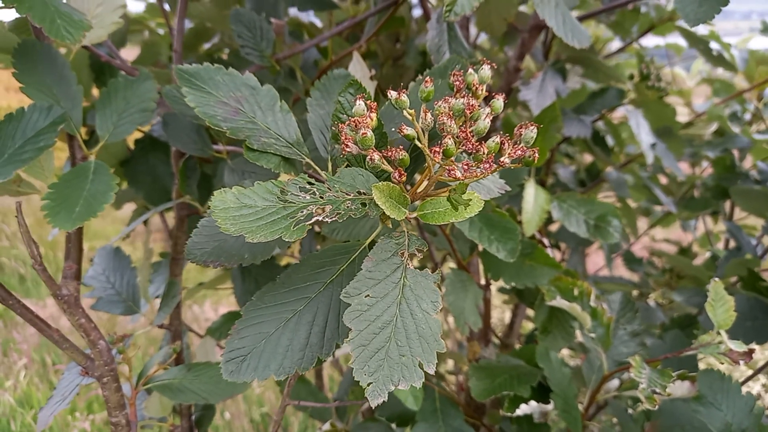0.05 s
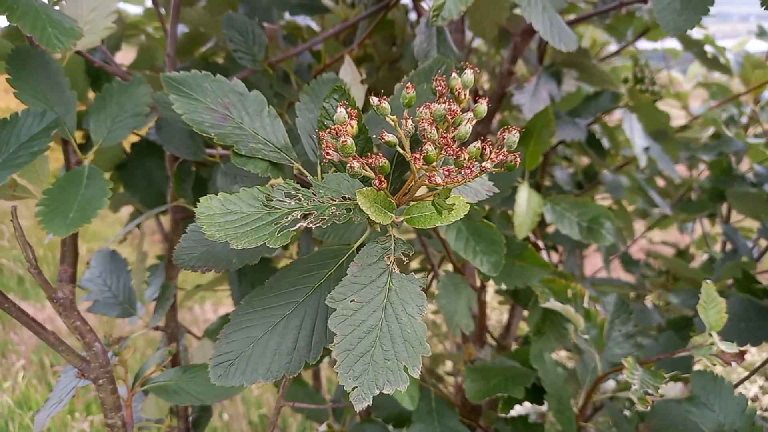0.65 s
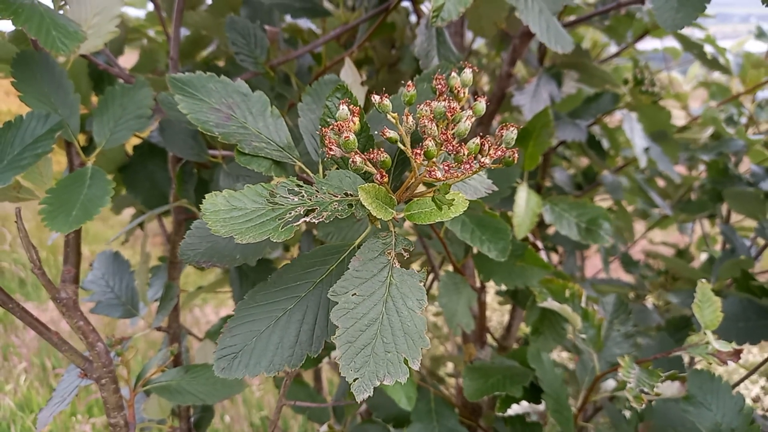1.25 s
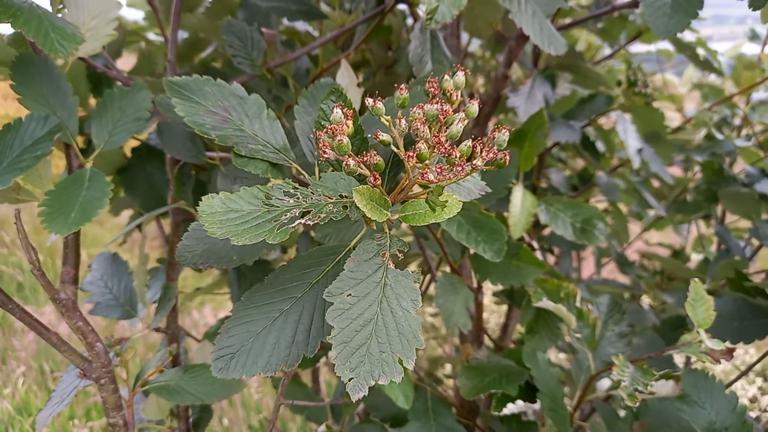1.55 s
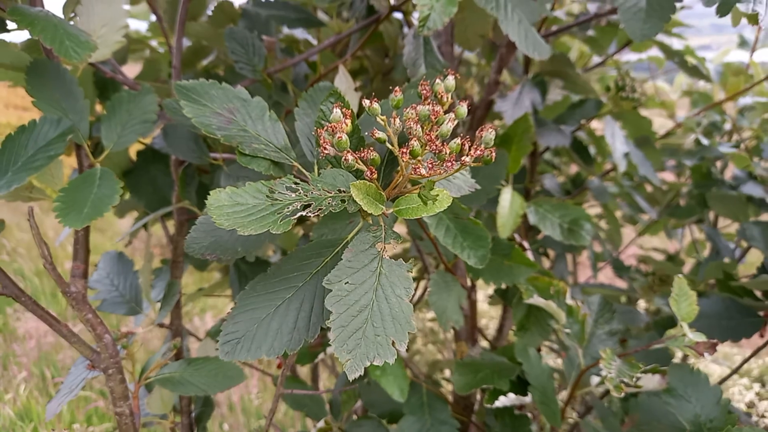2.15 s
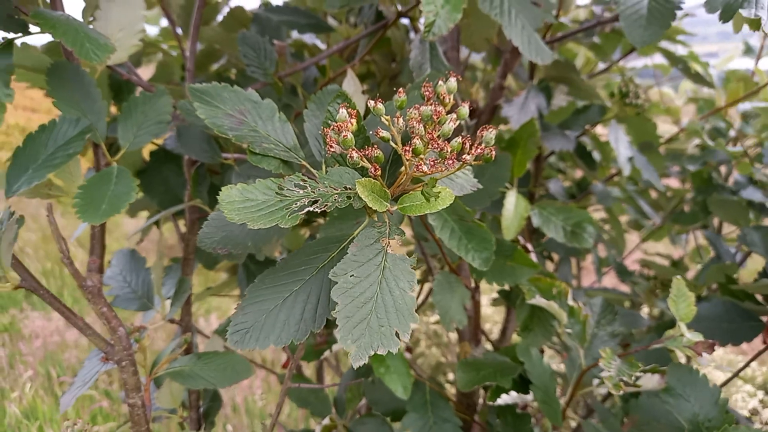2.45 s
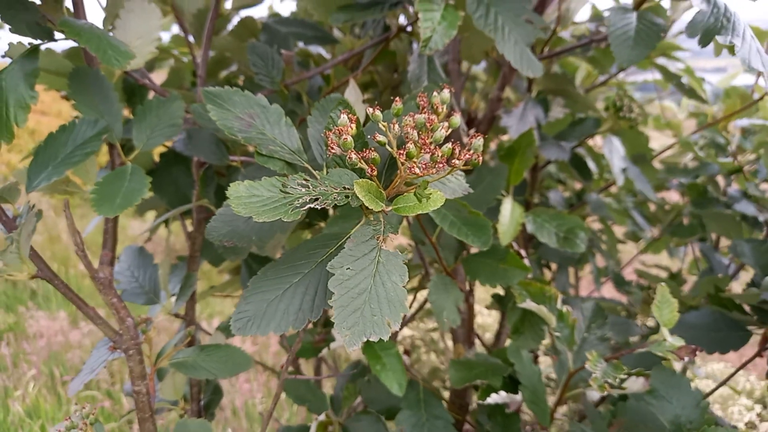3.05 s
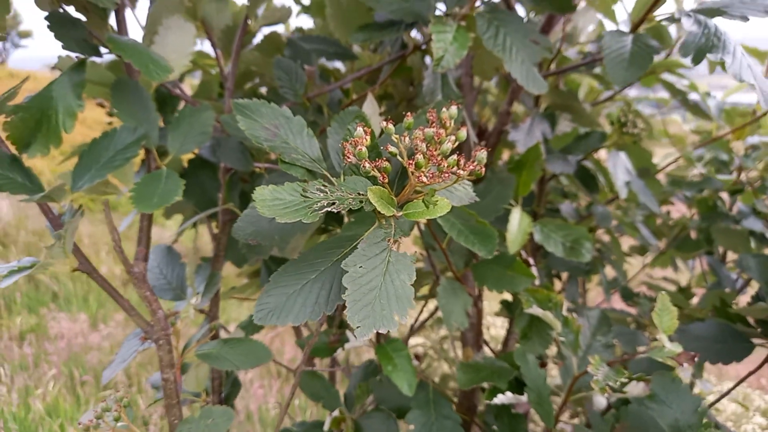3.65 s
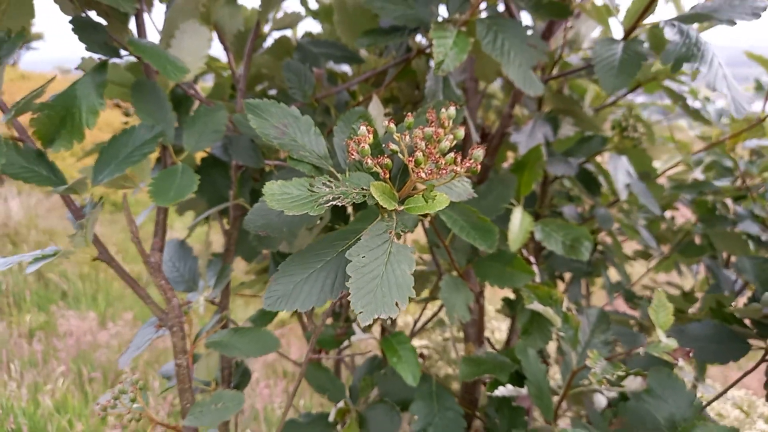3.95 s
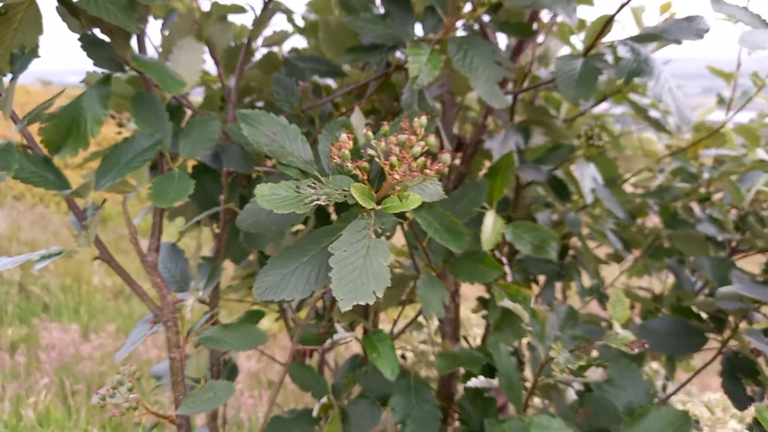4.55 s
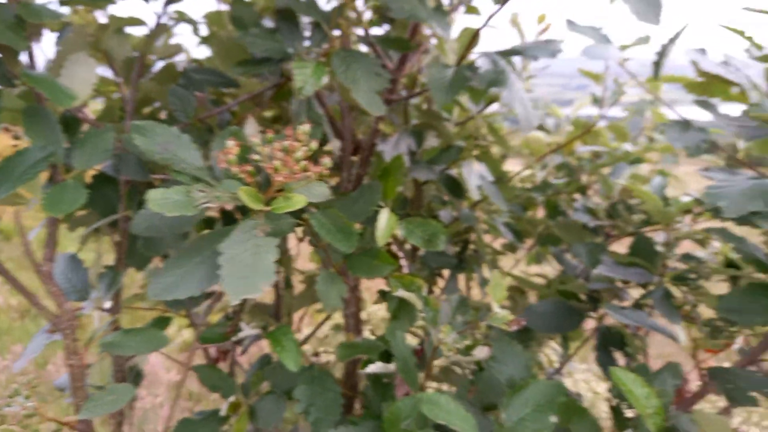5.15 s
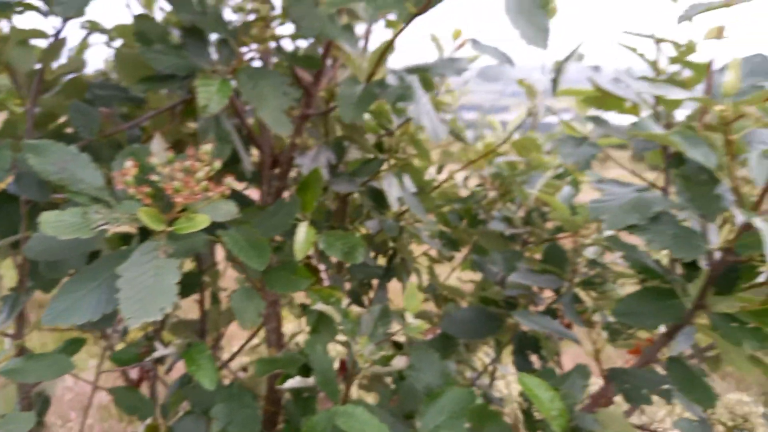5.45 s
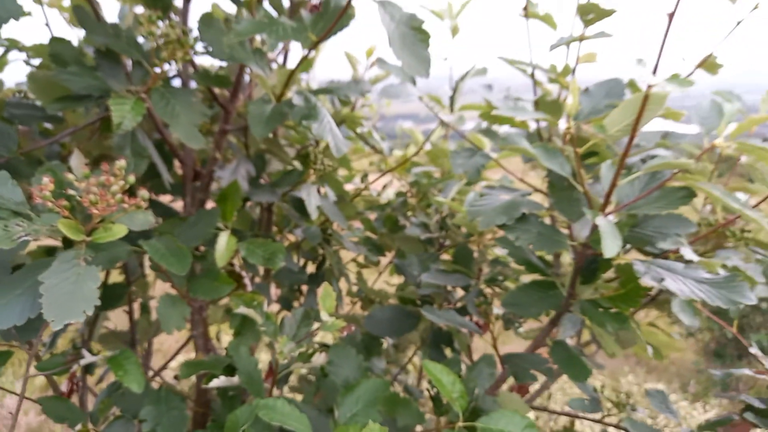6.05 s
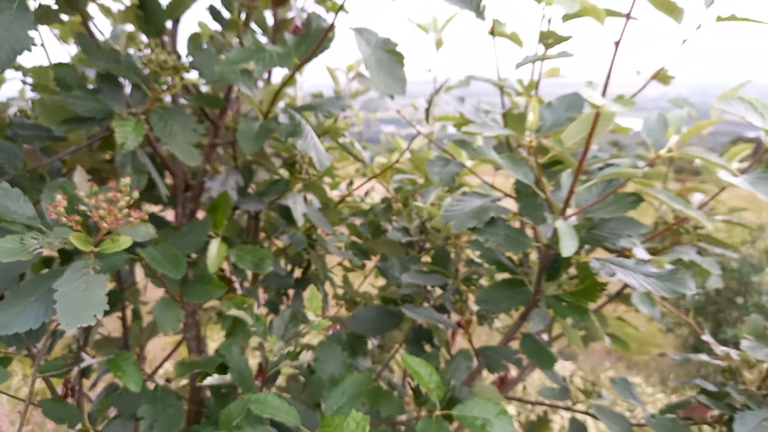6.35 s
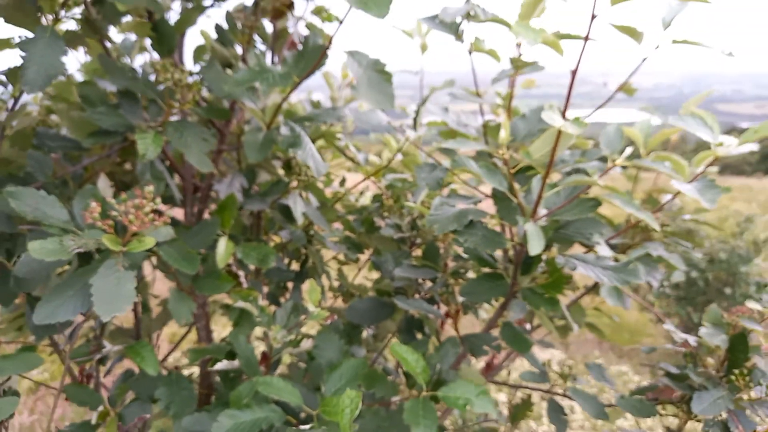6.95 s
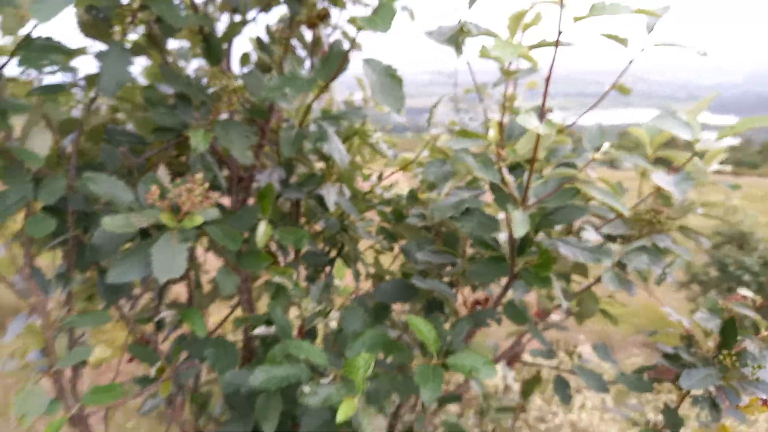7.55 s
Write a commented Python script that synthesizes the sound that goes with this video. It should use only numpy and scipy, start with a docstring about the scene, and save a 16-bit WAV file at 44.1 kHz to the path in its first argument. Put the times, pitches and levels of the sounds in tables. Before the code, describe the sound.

Evenly spaced raspy bird calls continue outdoors, with a gust of low wind buffeting early and faint leaf rustles later.

```python
"""A hoarse, crow-like bird calls to the right on an open hillside, rising and falling about every 0.8 s.
Its voice is jittery syrinx pulses and air through gliding throat resonances, scattered by the slope.
Over the faint valley hush, a gust buffets the two microphone ports from about 1.1 to 3.3 s.
Twigs tick and leaves rustle close by; late on, a small bird chirps far off."""
import sys
import numpy as np
from scipy import signal
from scipy.fft import rfft, irfft, next_fast_len
from scipy.io import wavfile
from scipy.ndimage import uniform_filter1d, map_coordinates

SR = 44100
rng = np.random.default_rng(int(sys.argv[2]) if len(sys.argv) > 2 else 0)


def file_out(sig):
    """Save sig as 16-bit WAV at sys.argv[1]."""
    # one column per channel
    cols = np.atleast_2d(sig).T
    # limit, then scale
    lim = np.clip(cols, -1, 1)
    pcm = np.round(lim * 32767).astype(np.int16)
    wavfile.write(sys.argv[1], SR, pcm)


N = 344862
TIME_S = np.arange(N) / SR
TOP_HZ = 15830

# Hoarse calls, levels relative: start_s, end_s, pitch_hz, climb_hz_per_s, scoop_s, drop_s, attack_s,
# swell_db, low_swell_db, low_hz, middle_hz, upper_hz, edge_hz, low_db, middle_db, upper_db, top_db,
# rough_share, gape_share, left_db, left_treble_db
CALLS = [ (-.45, 0.091, 262, 17.5, 0.042, 0.053, .04, -11, -3, 1320, 2030, 2430, 2840, -47, -51.5, -56.5, -70, 0.26, 0.2, -9, -17),
         (0.48, 0.959, 255, 45, 0.023, 0.065, 0.044, 5, 5.5, 1355, 2100, 2570, 2830, -47.5, -61.5, -60.5, -72, 0.1, 0, -10.5, -11),
         (1.151, 1.698, 270.7, 26.5, 0.043, 0.044, 0.022, 1, -7, 1386, 2126, 2467, 2780, -50.5, -55, -64, -72, 0.15, 0.01, -8, -11),
         (1.882, 2.472, 270.5, 37.5, 0.029, 0.048, 0.016, 11, 12.5, 1364, 2100, 2600, 2800, -61, -59.5, -68, -71.5, 0.18, 0.04, -6, -16),
         (2.653, 3.25, 273, 39, 0.054, .056, 0.052, -11, -15, 1480, 2050, 2740, 3830, -51, -60, -66.5, -61, 0.2, 1, -6.5, -7),
         (3.502, 4.164, 253.1, 49, 0.083, .036, 0.025, -5, 6, 1390, 1790, 2810, 3030, -65.5, -64.5, -70.5, -69.5, .08, 0, -6.5, -8.5),
         (4.387, 5.018, 259.8, -4.5, .118, 0.028, 0.04, 0, 3.5, 1398, 1883, 3000, 2950, -57, -57, -75, -70.5, .08, 0, -6, -23),
         (5.261, 5.768, 261.9, -10, 0.091, .016, 0.015, -7, 7, 1340, 1944, 2770, 3230, -58.5, -64, -77.5, -68.5, 0.02, 0.03, -4.5, -17),
         (6.089, 6.72, 247.6, 31, .06, 0.023, 0.042, -3.5, 1, 1330, 1740, 2620, 3300, -62.5, -69.5, -77, -66, .18, 0, -4, -35),
         (7.077, 7.713, 253.8, 60.5, 0.065, 0.055, 0.081, -5, -5.5, 1365, 1900, 2790, 3130, -55, -65, -70, -69, 0.06, 0, -6, -42)]
# Response of the low, middle, upper and top resonance to effort: attack_ratio, extra_swell_db
EFFORT_RESPONSE = [(1.57, -2.5), (1.4, -2), (1.25, 5), (0.62, 5.5)]
# Throat shaping around the resonances: freq_hz, gain_db
THROAT_SHAPE = [(950, -4), (1230, -16.5), (3600, 5.5), (4000, -1.5), (4550, -1.5), (4850, 1.5),
                (6100, -3.5), (7200, -5), (8000, -10.5)]
# Hillside decay: freq_hz, t60_s
HILLSIDE_DECAY = [(500, 0.15), (2000, 0.39), (6000, 0.5), (12000, 0.031)]
# Valley hush: freq_hz, gain_db
VALLEY_SPECTRUM = [(20, -9), (80, 3.5), (250, 2.5), (450, -2.5), (900, -4.5), (1300, -12), (2000, -19.5),
                   (3200, -24), (6000, -39), (16000, -29.5)]
# Light air at the ports: time_s, level_db
AIR_LEVEL = [(0, -56.5), (.8, -56), (1.05, -65.5), (3.6, -58), (3.85, -70.5), (4.85, -72.5), (5.1, -65),
             (5.5, -57.5), (6.1, -57.5), (6.5, -52.5), (6.8, -58), (6.98, -73), (7.25, -49.5),
             (7.55, -59.5), (7.82, -50)]
# Single puffs: centre_s, half_length_s, left_db, right_db
AIR_PUFFS = [(0.238, 0.088, -91, -43), (0.688, .022, -38.5, -60), (1.192, 0.021, -67, -23),
             (1.407, 0.099, -35, -16.5), (1.573, 0.061, -19, -26.5), (2.336, 0.029, -32, -25.5),
             (2.672, 0.032, -24.5, -26), (3.179, 0.057, -31.5, -32), (3.352, 0.064, -64, -46.5),
             (3.526, 0.033, -43.5, -43), (3.642, 0.058, -52, -46.5), (4.984, 0.034, -50, -52.5),
             (5.304, 0.036, -44, -69), (5.481, 0.037, -43.5, -35), (5.65, 0.03, -46.5, -48.5),
             (5.784, 0.022, -42.5, -45), (6.35, 0.074, -46, -50.5), (6.816, 0.056, -51.5, -47),
             (7.326, 0.041, -43, -42.5), (7.781, 0.022, -43.5, -35)]
# Light buffeting: freq_hz, gain_db
BREEZE_SPECTRUM = [(12, -28), (20, -22), (59, 3.5), (81, 2.5), (130, -3.5), (193, -30), (228, -14),
                   (338, -34), (420, -55), (550, -62), (920, -120)]
# Strong buffeting: freq_hz, gain_db
GUST_SPECTRUM = [(12, -42), (20, -30.5), (68, 6), (102, 4.5), (171, -3), (231, -7.5), (423, -38),
                 (633, -49.5), (1100, -51.5), (1430, -81), (2420, -120)]
# Small fast eddies, relative to the rumble: time_s, level_db
FLUTTER_LEVEL = [(1.1, -16.5), (1.4, -17), (1.62, -9), (1.8, -4), (2.1, -4.5), (2.45, -20.5), (3.3, -11.5),
                 (3.8, -36.5)]
# Small fast eddies: freq_hz, gain_db
FLUTTER_SPECTRUM = [(100, -15.5), (230, 2.5), (320, -6.5), (480, -19), (800, -43), (1500, -74)]
# Leaf and twig ticks, levels relative: start_s, level_db, body_db, pan_db
TWIG_TICKS = [(1.6179, -52, -24, 14), (1.987, -46.5, -1.5, -13.5), (2.0764, -59, 2, -10.5),
              (2.5822, -52.5, -13, -25.5), (4.184, -55, -25, 0.5), (4.3493, -50, -27, -17.5),
              (5.2987, -48, -16, -13), (5.3277, -50.5, -8, -23.5), (5.3547, -49.5, -14, -21),
              (6.022, -54, -21, -21), (6.4408, -48.5, -38, -18.5), (6.61, -60.5, 10, 0),
              (6.831, -65, -22, 10), (6.853, -46, -29, -2), (7.3687, -39.5, -25, -6.5),
              (7.4686, -48, -33, -18)]
# Bright and dull parts of a tick: freq_hz, gain_db
TICK_BRIGHT = [(500, 3), (3500, -17), (6500, -2.5), (10000, -21), (15000, -5.5)]
TICK_DULL = [(300, 19.5), (1500, 7), (3500, -13), (8000, -33)]
# Faint high background hiss, rising with the gust, levels relative: time_s, level_db
HISS_LEVEL = [(0, -93.5), (1.08, -91), (1.3, -84.5), (2, -88.5), (5, -83), (6, -88), (7.82, -83)]
# Close leaf stirs, levels relative: centre_s, half_length_s, fizz_db, pan_db, brush_db
LEAF_STIRS = [(3.94, .07, -75.5, 4, -94), (4.12, 0.22, -77.5, 2.5, -86.5), (4.74, 0.21, -79.5, 3.5, -87.5),
              (4.75, .04, -72, -5, -89), (6.49, 0.16, -70.5, -5, -86), (6.69, 0.07, -73.5, -8.5, -78.5),
              (6.96, 0.4, -78, -3.5, -79.5), (7.38, 0.12, -72.5, -5, -78.5), (7.66, .05, -77, -10, -84)]
# Leaf fizz and background hiss: freq_hz, gain_db
FIZZ_SPECTRUM = [(1000, -10), (4000, -5), (6500, -2), (8300, -5.5), (9500, -2.5), (11700, -6.5),
                 (13600, -3), (15000, -2.5), (15800, -4)]
# Sliding leaves: freq_hz, gain_db
BRUSH_SPECTRUM = [(300, 10), (1000, -27), (2000, 3.5), (3300, 7.5), (4200, 7.5), (5500, 8.5), (6800, 4),
                  (8000, -10), (12000, -18)]
# Distant small bird: start_s, length_s, from_hz, to_hz, level_db
FAR_CHIRPS = [(5.16, 0.053, 2490, 2940, -82), (5.61, 0.05, 2610, 3090, -75),
              (6.082, 0.052, 2490, 2950, -79), (7.65, 0.088, 2404, 2090, -76)]


def amp(db):
    """Decibels to gain."""
    return 10 ** (np.asarray(db) / 20)


def unit(x):
    """Each channel at rms 1."""
    return x / np.sqrt(np.mean(x ** 2, axis=-1, keepdims=True) + 1e-20)


def steady(x, span_s):
    """Swells slower than span_s levelled to rms 1."""
    size = max(int(span_s * SR), 8)
    return x / np.sqrt(np.abs(uniform_filter1d(uniform_filter1d(x ** 2, size), size)) + 1e-14)


def along(points, hz):
    """Table value on a log frequency axis."""
    freq_hz, values = np.transpose(points)
    return np.interp(np.log(hz + 1), np.log(freq_hz + 1), values)


def curve(points):
    """Table value over the scene's time."""
    return np.interp(TIME_S, *np.transpose(points))


def bell(centre_s, half_length_s):
    """Gaussian swell of height 1."""
    return np.exp(-((TIME_S - centre_s) / half_length_s) ** 2)


def wobble(knots_per_s, t=TIME_S):
    """Smooth random curve."""
    position = (t - t[0]) * knots_per_s
    return map_coordinates(rng.standard_normal(int(position[-1]) + 4), [position])


def wobble_pair(knots_per_s):
    """One random curve per channel."""
    return np.array([wobble(knots_per_s), wobble(knots_per_s)])


def filtered(x, response):
    """x times a frequency response."""
    n = x.shape[-1]
    padded = next_fast_len(n + 8192)
    return irfft(rfft(x, padded) * response(np.fft.rfftfreq(padded, 1 / SR)), padded)[..., :n]


def shaped(x, spectrum):
    """x through a spectrum table."""
    return filtered(x, lambda hz: amp(along(spectrum, hz)))


def noise(spectrum):
    """Uncorrelated stereo noise, rms 1."""
    return unit(shaped(rng.standard_normal((2, N)), spectrum))


def add(track, start_s, sound):
    """Mix a stereo sound into track."""
    first = round(start_s * SR)
    sound = sound[:, max(-first, 0):]
    part = track[:, max(first, 0):][:, :sound.shape[-1]]
    part += sound[:, :part.shape[-1]]


def panned(sound, pan_db):
    """Stereo placement; pan_db is left minus right."""
    return sound * amp([[pan_db / 2], [-pan_db / 2]])


def throat_resonance(x, hz, width_hz, glide):
    """Steep resonance, its centre moved to hz * glide by warping time."""
    clock = np.cumsum(glide) - glide[0]
    positions = np.interp(np.arange(int(clock[-1]) + 2), clock, np.arange(len(x)))
    warped = map_coordinates(x, [positions], mode="nearest")
    ringing = filtered(warped, lambda f: (1j * f * width_hz / (hz * hz - f * f + 1j * f * width_hz)) ** 3)
    return map_coordinates(ringing, [clock], mode="nearest")


def syrinx(t, pitch_hz, rough):
    """Jittery pulses and pulsed air; each overtone swells and drifts in phase on its own."""
    jittered_hz = pitch_hz * (1 + .003 * wobble(45, t) + .05 * rough * wobble(220, t))
    phase = 2 * np.pi * np.cumsum(jittered_hz) / SR
    overtones = 0
    for k in range(3, 40):
        gain = amp((4 + k / 10) * wobble(13.5, t))
        drift = 2 * np.pi * rng.random() + 0.35 * wobble(25, t) + 1.2 * rough * wobble(90, t)
        overtones += gain * np.cos(k * phase + drift)
    pulses = unit(overtones) * amp(1.1 * wobble(130, t))
    air = unit(rng.standard_normal(len(t)) * (1 + 0.27 * np.cos(phase)))
    return pulses, air


def call(start_s, end_s, pitch_hz, climb_hz_per_s, scoop_s, drop_s, attack_s, swell_db, low_swell_db,
         low_hz, middle_hz, upper_hz, edge_hz, low_db, middle_db, upper_db, top_db,
         rough, gape, left_db, left_treble_db):
    """Syrinx through the throat; pitch, level and resonances arch with the effort."""
    scoop_share, drop_share, wander_share = .25, .32, .008
    onset_db, fade_db, release_s, waver_db = 27.5, 31, 0.022, 1.5
    t = np.arange(round(start_s * SR), round(end_s * SR)) / SR
    length_s = end_s - start_s
    age_s, remaining_s, centred_s = t - start_s, end_s - t, t - (start_s + end_s) / 2
    arch = 1 - scoop_share * np.exp(-age_s / scoop_s) - drop_share * np.exp(-remaining_s / drop_s)
    arch *= 1 + climb_hz_per_s * centred_s / pitch_hz
    sung_hz = pitch_hz * arch * (1 + wander_share * wobble(14, t))
    low_env_db, middle_env_db, upper_env_db, top_env_db = [
        (growth_db + extra_db) * centred_s / length_s
        - onset_db * np.exp(-age_s / (attack_s * attack_ratio))
        - fade_db * np.exp(-remaining_s / release_s)
        + waver_db * wobble(13.87, t)
        for (attack_ratio, extra_db), growth_db in zip(EFFORT_RESPONSE, [low_swell_db] + 3 * [swell_db])]
    pulses, air = syrinx(t, sung_hz, rough)
    breakup = .25 * np.clip(1 - remaining_s / 0.045, 0, 1)  # falling pressure breaks the voice
    # A wide beak in mid-call lifts the upper resonance.
    lift = np.clip(gape * np.exp(-((age_s - 0.61 * length_s) / 0.071) ** 2), 0, 1)
    upper_gain, top_gain = amp(upper_db + upper_env_db), amp(top_db + top_env_db)
    resonances = [
        (low_hz, 330, edge_hz, amp(low_db + low_env_db - 2.86), left_db + 4.5, rough, .07),
        (middle_hz, 265, edge_hz, amp(middle_db + middle_env_db + 1.5), left_db, rough, .7),
        (upper_hz, 560, edge_hz, upper_gain * amp(1.8) * np.sqrt(1 - lift), left_db - 1, rough, .27),
        (3400, 650, edge_hz, upper_gain * amp(1.5) * np.sqrt(lift), left_db, rough, .27),
        (5600, 1500, TOP_HZ, top_gain, left_treble_db, rough + .5, .27),
        (8400, 1800, TOP_HZ, top_gain * amp(-30.5), left_treble_db + 12, rough, .27)]
    out = np.zeros((2, len(t)))
    for hz, width_hz, cutoff_hz, gain, shade_db, hoarseness, pitch_follow in resonances:
        air_share = np.clip(hoarseness + breakup, 0, 1)
        source = np.sqrt(1 - air_share) * pulses + np.sqrt(air_share) * air
        source = filtered(source, lambda f: amp(along(THROAT_SHAPE, f)
                                                - np.clip((f - cutoff_hz) / 12, 0, 40)))
        voiced = throat_resonance(source, hz, width_hz, glide=arch ** pitch_follow)
        out += steady(voiced, span_s=0.05) * gain * amp([[shade_db], [0]])
    return out * signal.windows.tukey(len(t), .05)


def hoarse_bird():
    """The calls and their scatter; direct sound reaches the left port 0.5 ms before the right."""
    calls = np.zeros((2, N))
    for row in CALLS:
        add(calls, row[0], call(*row))
    lag_s = np.array([[0], [23]]) / SR
    direct = filtered(calls, lambda hz: np.exp(-2j * np.pi * hz * lag_s))
    return amp(-3) * direct + amp(-13.5) * hillside(calls)


def hillside(x):
    """Diffuse scatter from bushes and slope; the highest treble dies first."""
    hz, t, spectra = signal.stft(rng.standard_normal((2, SR // 2)), SR, nperseg=256)
    decay = amp(-60 * t / along(HILLSIDE_DECAY, hz)[:, None])
    tail = signal.istft(spectra * decay, SR, nperseg=256)[1]
    return signal.fftconvolve(x, tail / np.linalg.norm(tail[0]), axes=1)[:, :N]


def valley():
    """Steady hush of the distant lowland."""
    return amp(-68.5 + 0.35 * wobble(4.7)) * noise(VALLEY_SPECTRUM)


def wind_level_db():
    """Level at each port: light air, one long sagging gust, single puffs."""
    left_start_s, right_start_s, end_s = 1.31, 1.137, 3.23
    peak_db, swirl_db = -27, 0.98
    rise_db_per_s, sag_db_per_s, fall_db_per_s = 452.5, 5, 296
    age_s = TIME_S - np.array([[left_start_s], [right_start_s]])
    gust_db = (peak_db - sag_db_per_s * age_s
               - rise_db_per_s * np.maximum(-age_s, 0)
               - fall_db_per_s * np.maximum(TIME_S - end_s, 0))
    swirl = amp(swirl_db * wobble_pair(13))
    power = (amp(curve(AIR_LEVEL)) ** 2 + amp(gust_db) ** 2) * swirl ** 2
    for centre_s, half_length_s, left_db, right_db in AIR_PUFFS:
        power += (amp([[left_db], [right_db]]) * bell(centre_s, half_length_s)) ** 2
    return 10 * np.log10(power)


def wind():
    """Eddies thump each port separately; stronger flow makes smaller eddies and a brighter rumble."""
    level_db = wind_level_db()
    force = np.clip((level_db + 46) / 20, 0, 1)
    rumble = np.sqrt(force) * noise(GUST_SPECTRUM) + np.sqrt(1 - force) * noise(BREEZE_SPECTRUM)
    flutter = amp(curve(FLUTTER_LEVEL)) * noise(FLUTTER_SPECTRUM)
    thumps = .3 + np.clip(wobble_pair(34) + .35, 0, 2)
    return amp(level_db) * steady((rumble + flutter) * thumps, span_s=0.088)


def twig_ticks():
    """Sharp snap and short scrape; stiffer twigs add a dull body and a low push."""
    snap_t60_s, scrape_t60_s, push_t60_s, push_hz = 0.011, 0.24, 0.016, 230
    out, t = np.zeros((2, N)), np.arange(SR // 10) / SR
    envelope = amp(-60 * t / snap_t60_s) + amp(-12 - 60 * t / scrape_t60_s)
    push = amp(15 - 60 * t / push_t60_s) * np.sin(2 * np.pi * push_hz * t)
    for start_s, level_db, body_db, pan_db in TWIG_TICKS:
        snap = rng.standard_normal(len(t)) * envelope
        tick = shaped(snap, TICK_BRIGHT) + amp(body_db) * (shaped(snap, TICK_DULL) + push)
        add(out, start_s, panned(amp(level_db - 7) * tick, pan_db))
    return out


def leaves_and_hiss():
    """Over a faint hiss, leaves fizz, snap as they catch, and brush as they slide near the right port."""
    grain = unit(amp(2.5 * wobble_pair(900)))
    fizz_power, brush_power = amp(curve(HISS_LEVEL)) ** 2, 0
    for centre_s, half_length_s, fizz_db, pan_db, brush_db in LEAF_STIRS:
        swell = bell(centre_s, half_length_s)
        fizz_power = fizz_power + panned(amp(fizz_db) * swell, pan_db) ** 2
        brush_power = brush_power + (amp(brush_db) * swell) ** 2
    level_db = 10 * np.log10(fizz_power)
    snaps_per_s = 45 * np.clip((level_db + 88.5) / 12, 0, 1)
    snaps = (rng.random((2, N)) < snaps_per_s / SR) * rng.exponential(7, (2, N))
    fizz = amp(level_db + 3) * (noise(FIZZ_SPECTRUM) * grain + shaped(snaps, FIZZ_SPECTRUM))
    brush = np.sqrt(brush_power) * amp(1.1 * wobble(33)) * noise(BRUSH_SPECTRUM) * grain
    return fizz + panned(brush, pan_db=-22.5)


def small_bird():
    """Thin, quavering glides from far off, with hillside scatter."""
    out = np.zeros((2, N))
    for start_s, length_s, from_hz, to_hz, level_db in FAR_CHIRPS:
        t = np.arange(int(length_s * SR)) / SR
        pitch_hz = np.linspace(from_hz, to_hz, len(t)) * (1 + 0.014 * wobble(400, t))
        chirp = np.hanning(len(t)) * np.sin(2 * np.pi * np.cumsum(pitch_hz) / SR)
        add(out, start_s, panned(amp(level_db) * chirp, pan_db=0))
    return out + amp(0.5) * hillside(out)


def scene():
    """Everything that reaches the two ports."""
    return hoarse_bird() + small_bird() + wind() + leaves_and_hiss() + twig_ticks() + valley()


def record(dry):
    """Hard band limit at TOP_HZ."""
    return filtered(dry, lambda hz: hz < TOP_HZ)


dry = scene()
out = record(dry)
file_out(out)
```